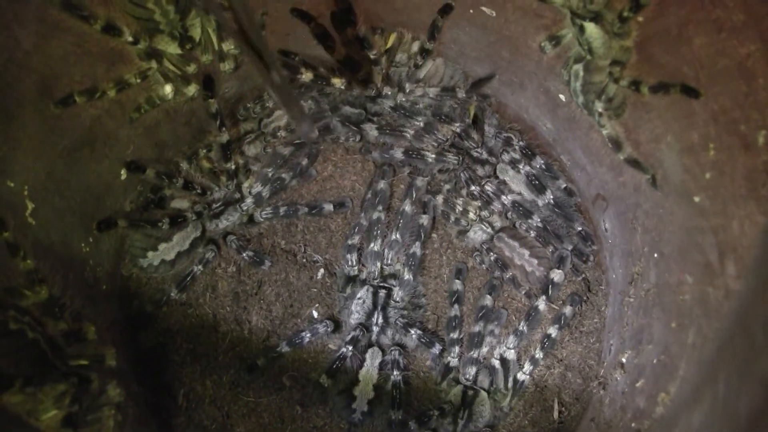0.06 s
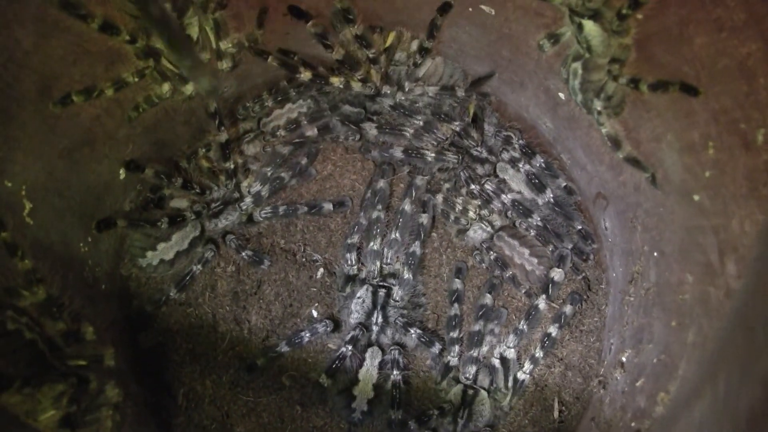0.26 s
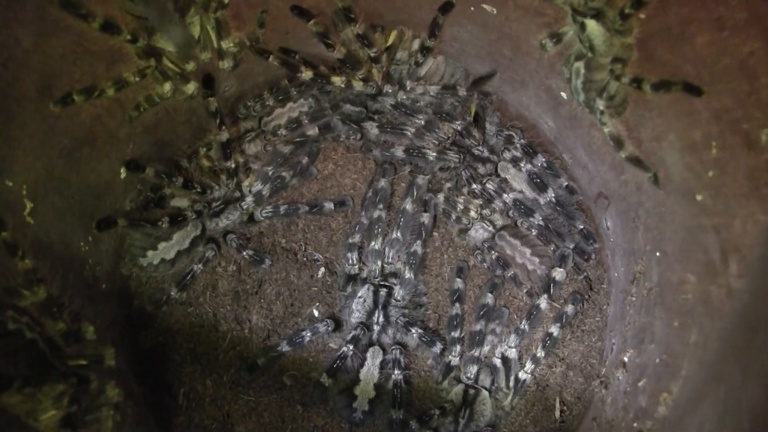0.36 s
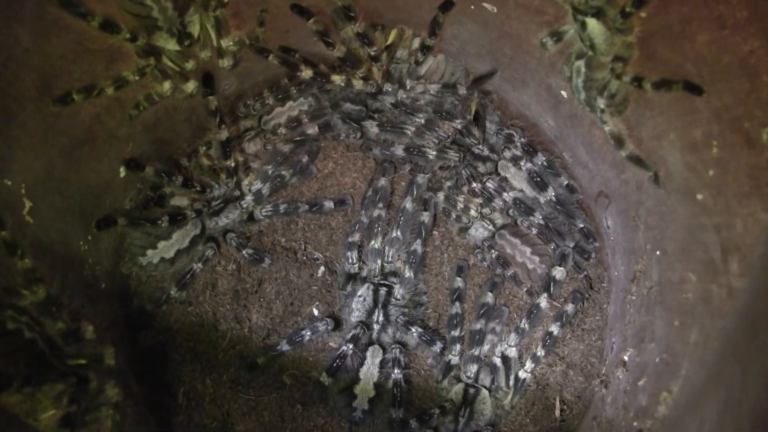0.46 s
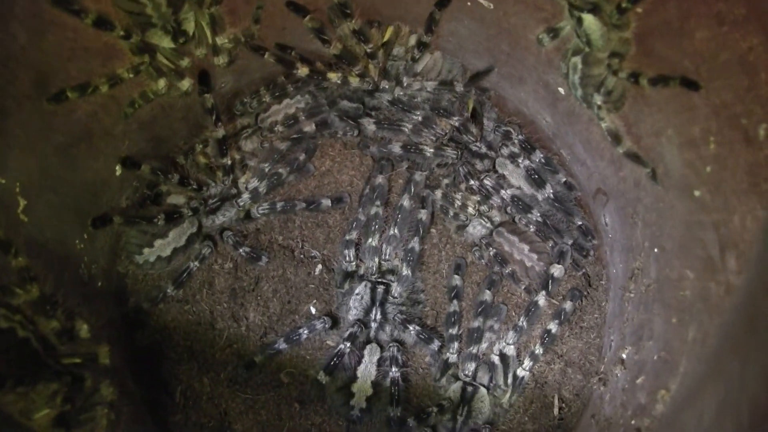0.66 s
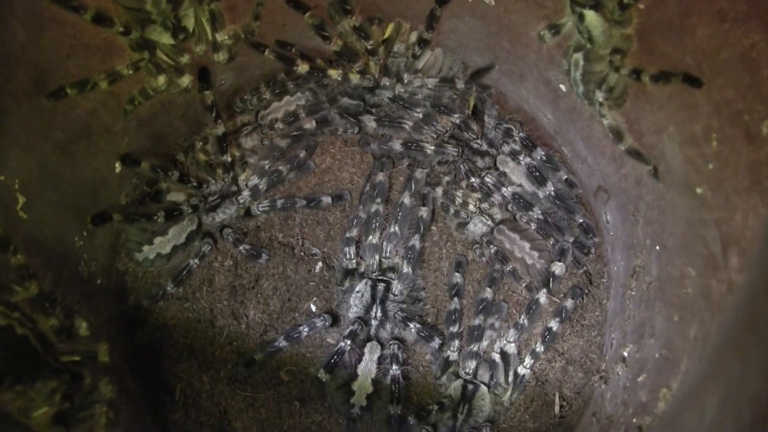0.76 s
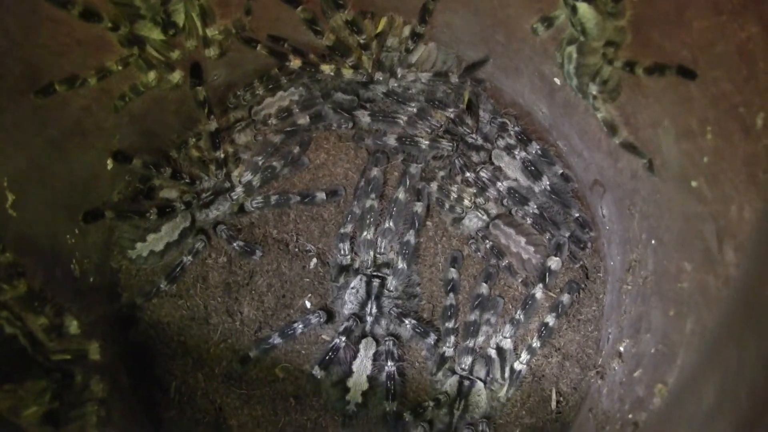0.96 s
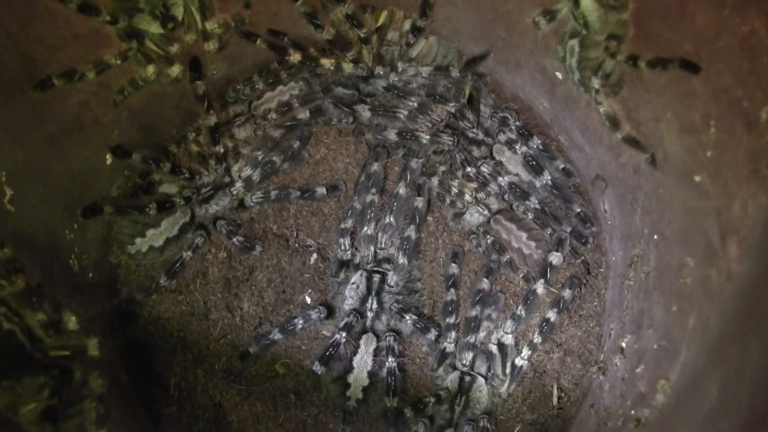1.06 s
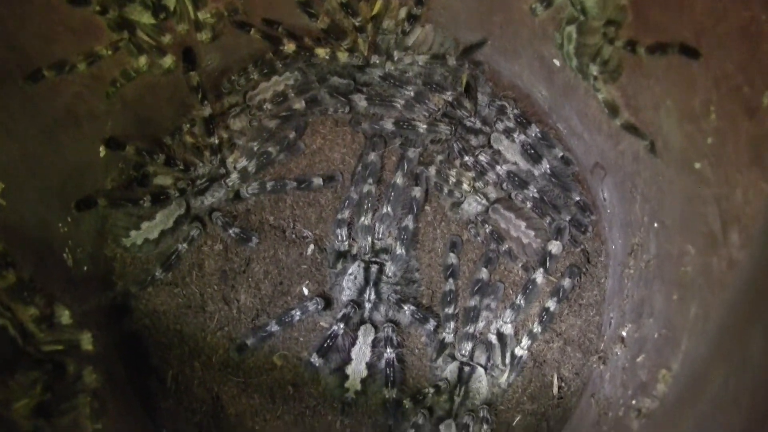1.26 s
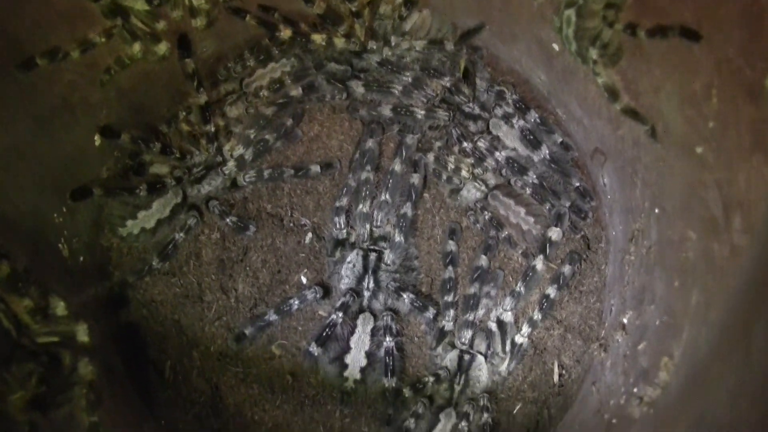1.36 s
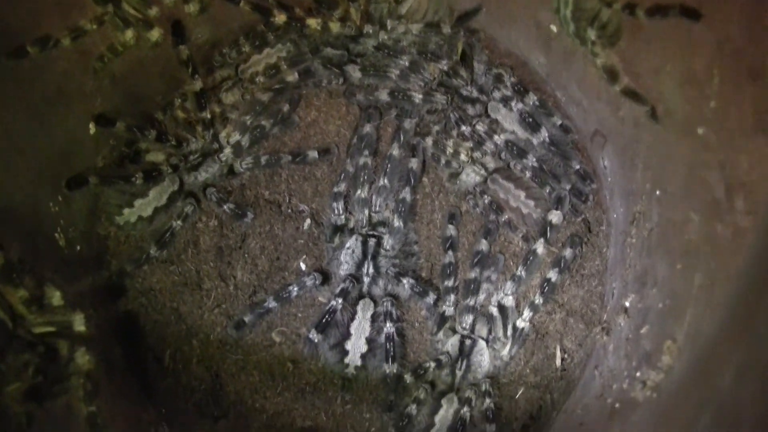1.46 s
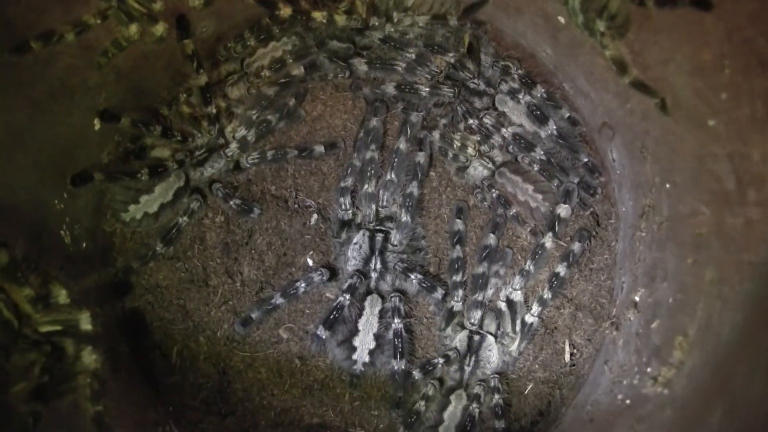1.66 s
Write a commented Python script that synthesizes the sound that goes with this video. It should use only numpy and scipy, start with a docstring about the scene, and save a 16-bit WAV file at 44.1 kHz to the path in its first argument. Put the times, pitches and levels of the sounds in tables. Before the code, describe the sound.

A sharp, hollow knock hits a plastic tub close by at about 0.2 seconds and bounces quickly. From 0.3 to 0.8 seconds something scrapes along the wall with a light rasp, a low judder and small taps, ending in a firmer knock. Faint, short cricket chirps come and go throughout over a soft hiss in a small room, with a very faint squeak near 1.4 seconds.

```python
"""Crickets chirp here and there in a small room, over a soft hiss, throughout.
At 0.23 s something knocks a plastic tub of tarantulas and bounces: each blow cracks, and the tub
rings with a hollow low note and a few brighter ones. From 0.3 to 0.8 s it scrapes along the wall,
with more knocks: tiny slips rasp, stick and slip make the wall judder. A faint squeak at 1.4 s."""
import sys
import numpy as np
from scipy import signal
from scipy.fft import rfft, irfft
from scipy.io import wavfile
from scipy.ndimage import uniform_filter1d

SR = 44100
rng = np.random.default_rng(int(sys.argv[2]) if len(sys.argv) > 2 else 0)


def bounce(signal):
    """Save signal as a 16-bit WAV file at the path given by the first command-line argument."""
    frames = np.transpose(np.atleast_2d(signal))
    limited = np.clip(frames, -1, 1)
    pcm = np.round(limited * 32767).astype(np.int16)
    wavfile.write(sys.argv[1], SR, pcm)


N = 74970
T = np.arange(N) / SR
ROOM_T60_S, ROOM_COHERENCE = 0.21, 0.64


def amp(db):
    """dB to gain."""
    return 10 ** (np.asarray(db) / 20)


def unit_rms(x):
    """Scale to rms 1."""
    return x / np.sqrt(np.mean(x ** 2) + 1e-20)


def spectrum_at(points, hz):
    """Interpolate over log frequency."""
    points_hz, value = np.transpose(points)
    return np.interp(np.log(hz + 1), np.log(points_hz + 1), value)


def convolve(x, response):
    """Convolve per channel, cut to N."""
    return signal.fftconvolve(np.atleast_2d(x), np.atleast_2d(response), axes=1)[:, :N]


def wander(rate_hz):
    """Smooth random drift, rms 1."""
    lowpass = np.exp(-(np.fft.rfftfreq(N, 1 / SR) / rate_hz) ** 2)
    return unit_rms(irfft(rfft(rng.standard_normal(N)) * lowpass, N))


def click(points, size=2048):
    """Minimum-phase click of given spectrum, unit energy."""
    log_gain = np.log(amp(spectrum_at(points, abs(np.fft.fftfreq(size, 1 / SR)))))
    pulse = np.fft.ifft(np.exp(np.conj(signal.hilbert(log_gain)))).real[:size // 2]
    return pulse / np.linalg.norm(pulse)


def noise_spectra(coherence):
    """Left and right spectra of partly coherent white noise."""
    left, other = rfft(rng.standard_normal((2, N)))
    return np.array([left, coherence * left + np.sqrt(1 - coherence ** 2) * other])


def tail(t60_s, coherence):
    """Diffuse stereo decay, 1 ms onset, unit energy per side."""
    decay = irfft(noise_spectra(coherence), N) * amp(-60 * T / t60_s) * np.minimum(T / .001, 1)
    return decay / np.linalg.norm(decay, axis=1, keepdims=True)


def hiss():
    """Soft room noise, near mono in the bass."""
    # noise spectrum (frequency [Hz], relative density [dB])
    density = [(18, -30), (45, -24), (90, -16), (130, -6), (200, -3), (280, -1), (410, -4), (656, -3.5),
               (1300, -9), (1910, -13), (2130, -9), (2420, -15), (3490, -18), (4000, -18), (4400, -12),
               (5040, -17), (8000, -22), (13300, -29), (15500, -32)]
    # noise envelope (time [s], level [dB])
    envelope = [(0, -57.5), (.9, -56.5), (1.3, -55.5), (1.7, -55)]
    # left-right likeness (frequency [Hz], coherence [0-1])
    coherence = [(50, 1), (200, 0.28), (700, 0.2), (2000, 0.12), (6000, 0.051), (15000, 0.017)]
    hz = np.fft.rfftfreq(N, 1 / SR)
    noise = irfft(noise_spectra(spectrum_at(coherence, hz)) * amp(spectrum_at(density, hz)), N)
    return unit_rms(noise) * amp(np.interp(T, *np.transpose(envelope)))


def crickets():
    """Short falling tones, clean or raspy, through the wing resonance, smeared by the room."""
    # chirps (start [s], length [s], level [dB], pitch [Hz], roughness [x waver])
    chirps = [(.0, .02, -57.5, 4261, 0.2), (0.064, .025, -65.5, 4260, 0.13),
              (0.161, .02, -56.5, 4460, 0.74), (0.331, .03, -44.5, 4264, 0.65),
              (0.399, .026, -43.5, 4335, 0.68), (0.843, .02, -55, 4490, 0.88), (0.891, .022, -55, 4217, 0),
              (1.012, .02, -46.5, 4388, 1), (1.034, .02, -55, 4435, 1), (1.066, .034, -45, 4324, 0.84),
              (1.15, .02, -51.5, 4490, 1), (1.216, .03, -52.5, 4393, 1), (1.386, .024, -57, 4250, 0.23),
              (1.422, .04, -59.5, 4430, 1), (1.488, .03, -60, 4460, 1), (1.578, .026, -55.5, 4417, 1.01),
              (1.61, .02, -57.5, 4323, 0.88), (1.678, .03, -52.5, 4290, 0.54)]
    sag_hz_per_s, wing_band_hz = 3100, (4130, 4740)
    waver = 0.0367 * wander(333)
    song = np.zeros(N)
    for start_s, length_s, db, hz, roughness in chirps:
        progress = np.clip((T - start_s) / length_s, 0, 1)
        pitch_hz = hz * (1 + roughness * waver) - sag_hz_per_s * length_s * (progress - .5)
        swell = np.sqrt(2 * abs(np.sin(np.pi * progress)))
        song += amp(db) * swell * np.sin(2 * np.pi * np.cumsum(pitch_hz) / SR)
    song = signal.sosfilt(signal.butter(3, wing_band_hz, "band", fs=SR, output="sos"), song)
    analytic = signal.hilbert(song)
    song += amp(-31) * abs(analytic) * np.cos(2 * np.angle(analytic))  # faint octave
    return amp(-2.5) * song + amp(1) * convolve(song, tail(ROOM_T60_S, ROOM_COHERENCE))


def tub_echo():
    """Direct path, one echo and a short flutter, dispersed by the bending wall."""
    echo_s = .0028
    early = np.zeros((2, N))
    early[:, 0] = 1
    early[:, round(echo_s * SR)] = amp(-10)
    response = early + amp(-2.5) * tail(t60_s=.024, coherence=.75)
    poles = signal.iirpeak(6000, Q=1.6, fs=SR)[1]
    response = signal.lfilter(poles[::-1], poles, response)  # all-pass
    return response / np.sqrt(np.sum(response ** 2) / 2)


def tub_ring(low, rubbed=False):
    """Decaying upper or low tub modes; the low ones reach each ear slightly late."""
    # tub modes (frequency [Hz], struck [dB], rubbed [dB], t60 [s], left minus right [dB])
    modes = [(122, -27, -12, 0.3, 11), (164, -18, -38, .08, 25), (198, -3, 0.5, 0.17, 6),
             (232, 4.5, -2, 0.078, 9.5), (293.4, 1.5, 2.5, 0.1, -14.5), (372.5, -7.5, -5.5, 0.15, -0.5),
             (484, -13, -0.5, 0.052, -8.5), (747, -15, -28, 0.077, -13), (991.5, -6.5, -57, 0.14, -12.5),
             (1084, -3.5, -16.5, 0.14, 9), (1120, -45, -20, 0.13, -17), (1483, -12.5, -7, 0.04, 9),
             (1525, -1.5, -6, 0.04, -10.5), (2261, -8.5, -19, 0.063, 4), (4040, 0, -11.5, 0.037, 3)]
    split_hz, low_cut_hz, lags_s = 650, 286, (.0017, .0023)
    ring = np.zeros((2, N))
    for hz, struck_db, rubbed_db, t60_s, pan_db in modes:
        if (hz < split_hz) == low:
            db = (rubbed_db if rubbed else struck_db) + np.array([[pan_db], [-pan_db]]) / 2
            ring += amp(db - 60 * T / t60_s) * np.sin(2 * np.pi * hz * T)
    highpass = signal.butter(2, low_cut_hz if low else split_hz, "high", fs=SR, output="sos")
    ring = signal.sosfilt(highpass, ring)
    if low:
        ring = np.array([np.interp(T - lag_s, T, side, left=0) for side, lag_s in zip(ring, lags_s)])
    return ring / np.sqrt(np.sum(ring ** 2) / 2)


def knocks():
    """Each blow cracks and drives the upper modes (ring) and low modes (thump)."""
    # blows on the tub (time [s], crack [dB], ring [dB], thump [dB])
    blows = [(.2326, -1, -8.5, 1.5), (.2580, -22.5, -15, -6.5), (0.2723, -19, -19, -13.5),
             (0.2837, -24.5, -19, -18.5), (0.292, -28, -22.5, -14.5), (0.5038, -22.5, -23.5, -20.5),
             (0.5592, -17.5, -33, -32), (0.578, -20.5, -32, -22), (0.6628, -22, -31, -39),
             (0.7399, -26, -46, -36), (0.751, -20.5, -32, -47), (0.7863, -20, -41, -35),
             (.7912, -11.5, -18, -23.5), (0.8031, -23.5, -51, -41)]
    # crack spectrum (frequency [Hz], relative level [dB])
    crack_spectrum = [(60, -19), (150, -11.5), (500, -5), (1400, -2.5), (2000, -10.5), (2850, -4.5),
                      (3230, -15.5), (3650, 2), (4500, 2.5), (5200, -1.5), (7100, -3), (7600, -15.5),
                      (10000, -27), (15500, -39)]
    force = np.zeros((3, N))
    for time_s, *levels_db in blows:
        force[:, round(time_s * SR)] += amp(levels_db)
    crack, ring, thump = force
    modes = convolve(ring, tub_ring(low=False)) + convolve(thump, tub_ring(low=True))
    return convolve(convolve(crack, click(crack_spectrum)), tub_echo()) + modes


def scrapes():
    """Dense tiny slips rasp on the wall and drive its modes."""
    # strokes (start [s], length [s], rasp [dB], ring [dB], thump [dB])
    strokes = [(.298, 0.13, -55.5, -59, -57.5), (.39, 0.018, -60, -61.5, -83),
               (0.445, 0.027, -51.5, -57.5, -62), (0.478, 0.008, -47, -56, -43.5),
               (.488, 0.045, -55.5, -60.5, -53.5), (0.54, 0.058, -47.5, -53, -54.5),
               (0.574, 0.0043, -41, -55, -56), (0.605, 0.043, -58.5, -65, -58.5),
               (0.631, 0.025, -54, -67, -61), (0.6615, 0.011, -46, -44.5, -54),
               (0.672, .02, -50, -58, -51.5), (0.695, 0.01684, -47.5, -43.5, -49.5),
               (0.726, 0.0526, -50.5, -49.5, -58), (0.782, 0.0073, -47.5, -44, -40)]
    # rasp spectrum (frequency [Hz], relative level [dB])
    rasp_spectrum = [(60, -58), (150, -42), (500, 5.5), (900, -14), (1400, -1.5), (2000, -45), (2750, -5.5),
                     (3230, -15.5), (3950, 1), (4500, 3.5), (5150, -6.5), (5600, 7), (5880, -8), (6100, 0),
                     (7100, -6), (7700, -17), (10000, -37), (15500, -25)]
    slips_per_s, spread_db, rise_s, fall_s = 1500, 5, 0.0032, 0.0028
    slips = (rng.random(N) < slips_per_s / SR) * rng.choice([-1, 1], N)
    slips = slips * amp(spread_db * np.minimum(rng.exponential(1, N), 3))
    slips /= np.sqrt(abs(uniform_filter1d(slips ** 2, size=400)) + 1e-6)  # even out the power
    force = np.zeros((3, N))
    for start_s, length_s, *levels_db in strokes:
        attack = np.clip((T - start_s) / rise_s, 0, 1)
        release = np.exp(-np.maximum(T - start_s - length_s, 0) / fall_s)
        force += amp(levels_db)[:, None] * attack * release
    rasp, ring, thump = force * slips
    modes = convolve(ring, tub_ring(low=False, rubbed=True))
    modes += convolve(thump, tub_ring(low=True, rubbed=True))
    return convolve(convolve(rasp, click(rasp_spectrum)), tub_echo()) + modes


def judder():
    """Stick and slip rock the wall: a low, uneven, rising groan."""
    # wall vibration (time [s], level [dB], pitch [Hz])
    groan = [(0.301, -53.5, 139.8), (0.336, -62.5, 153), (0.364, -51.5, 188.8), (0.411, -85, 194),
             (.48, -66, 188.2), (0.504, -45.5, 200.7), (.535, -51, 194.3), (.57, -66, 189),
             (0.614, -47.5, 198), (0.651, -64, 212.4), (0.701, -49, 226.5), (.75, -56.5, 229.7),
             (.787, -47.5, 223.3), (.808, -78, 225)]
    time_s, db, hz = np.transpose(groan)
    pitch_hz = np.interp(T, time_s, hz) * (1 + 0.048 * wander(51))
    level = np.interp(T, time_s, amp(db), left=0, right=0) * (1 + 0.13 * wander(48.8))
    return np.sqrt(2) * level * np.sin(2 * np.pi * np.cumsum(pitch_hz) / SR)


def squeak():
    """One faint, brief, wavering tone."""
    start_s, length_s = 1.425, .06
    progress = np.clip((T - start_s) / length_s, 0, 1)
    swell = np.sqrt(2 * abs(np.sin(np.pi * progress)))
    pitch_hz = 1605 * (1 + 0.0072 * wander(100))
    return amp(-61) * swell * np.sin(2 * np.pi * np.cumsum(pitch_hz) / SR)


def scene():
    """Tub close by; crickets, squeak and room hiss behind."""
    tub = knocks() + scrapes() + judder()
    reverb = amp(-18.5) * convolve(tub, tail(ROOM_T60_S, ROOM_COHERENCE))
    return tub + reverb + crickets() + squeak() + hiss()


def record(dry):
    """Steep low-pass."""
    cutoff_hz = 15900
    lowpass = signal.firwin(511, cutoff_hz, window=("kaiser", 9), fs=SR)
    return signal.oaconvolve(dry, lowpass[None], "same")


dry = scene()
out = record(dry)
bounce(out)
```